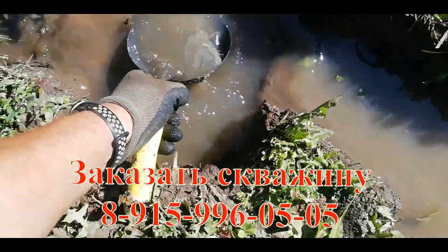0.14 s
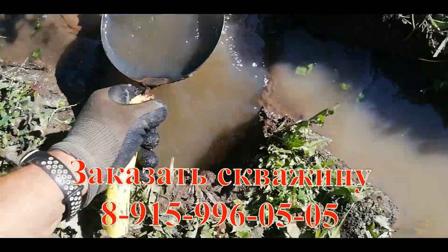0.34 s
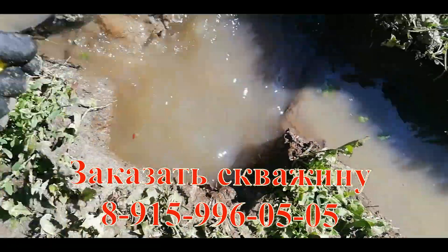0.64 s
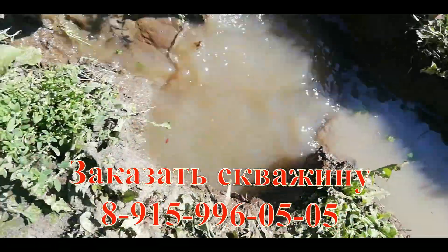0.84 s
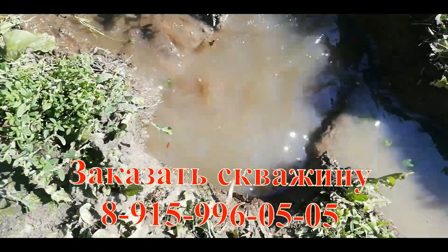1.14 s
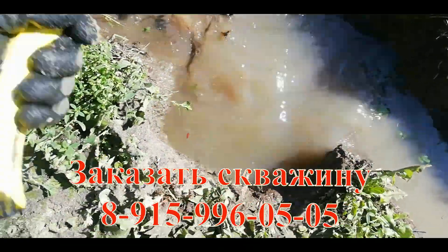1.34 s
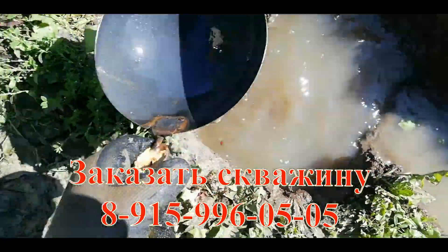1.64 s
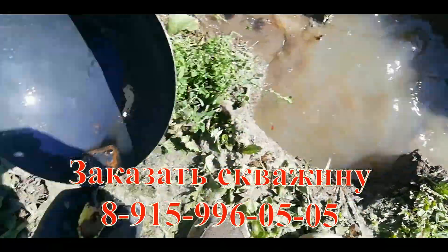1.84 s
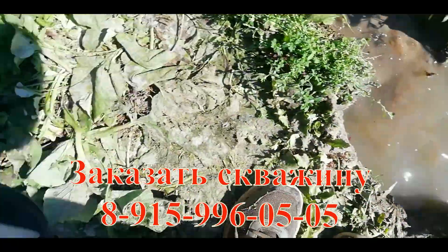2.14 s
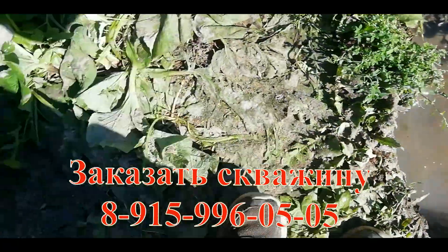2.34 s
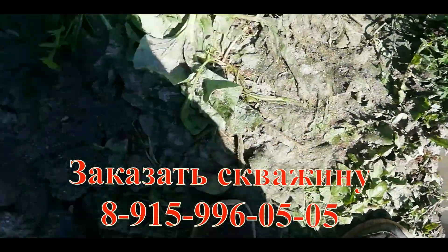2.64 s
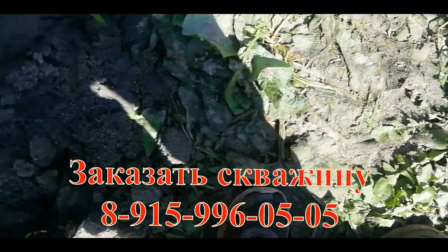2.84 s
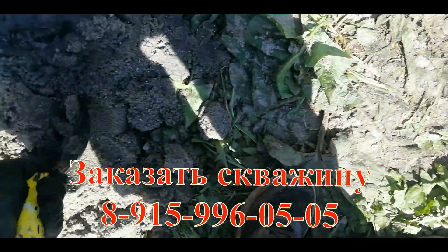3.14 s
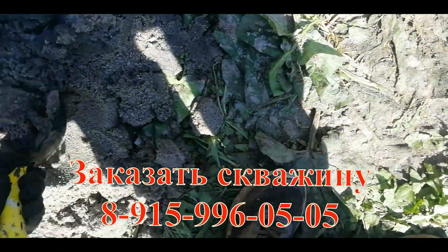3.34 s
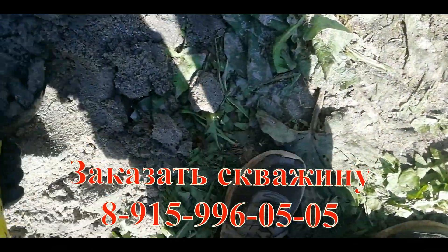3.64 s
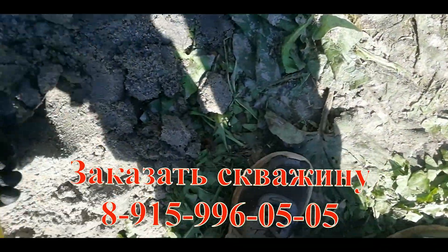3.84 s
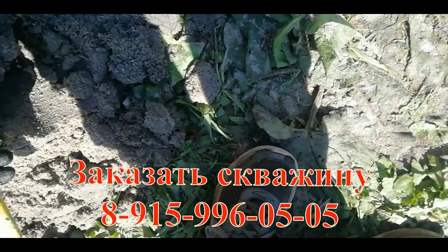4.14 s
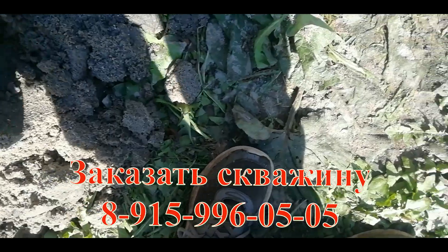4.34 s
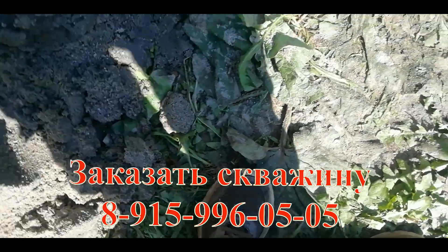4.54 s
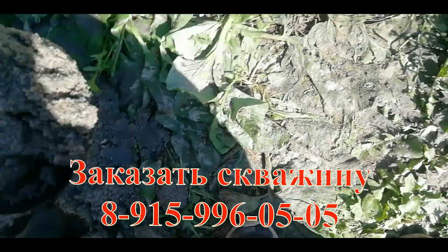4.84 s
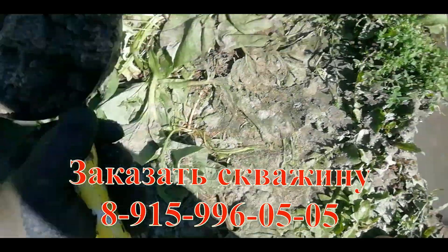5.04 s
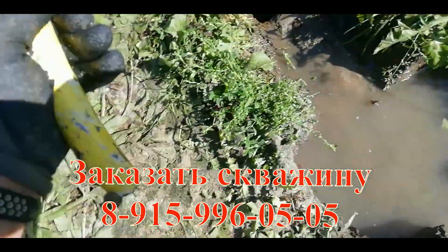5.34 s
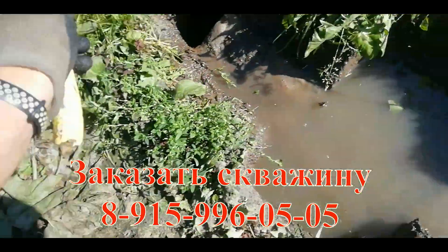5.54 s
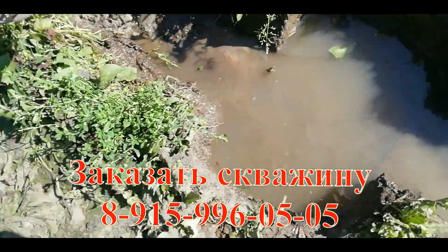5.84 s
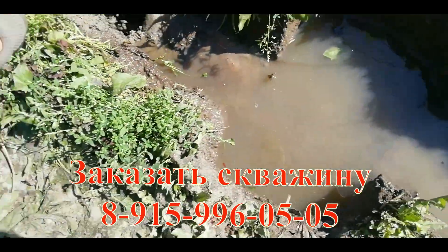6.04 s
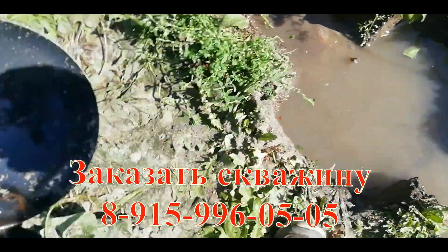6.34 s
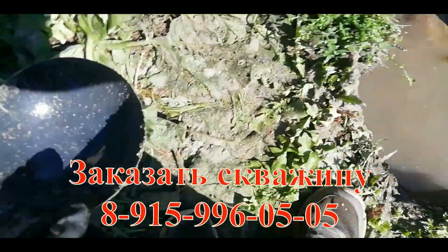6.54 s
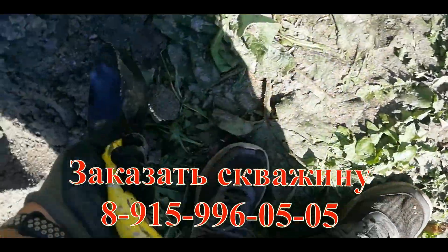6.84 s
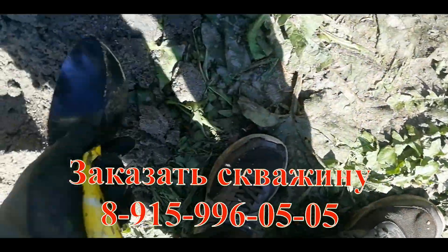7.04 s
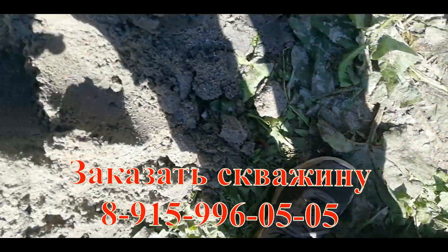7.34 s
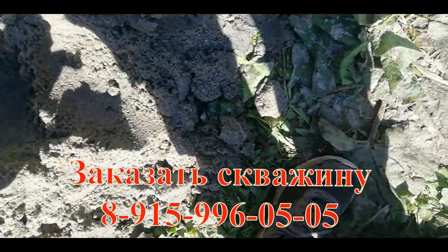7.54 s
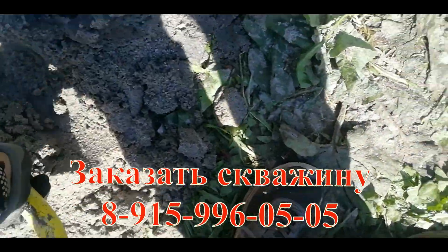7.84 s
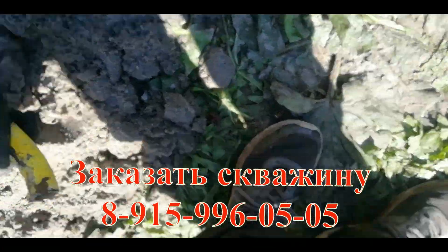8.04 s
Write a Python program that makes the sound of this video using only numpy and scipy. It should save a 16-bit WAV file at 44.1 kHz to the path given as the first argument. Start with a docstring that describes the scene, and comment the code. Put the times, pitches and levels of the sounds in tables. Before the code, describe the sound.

Close outdoor pickup on a handheld phone. A steel scoop scrapes lightly and knocks, leaves a muddy pool with a gulp, and throws water that lands with a spattering splash and bubbly drops. Another ringing scrape and clunk follow, then sharp hisses of wet sand with dull knocks. After quieter gurgling comes a sudden sandy swish, a longer rough metallic drag, and a last soft sandy slide.

```python
"""A steel scoop is dragged and knocked: stick-slip noise and short pushes ring its resonances.
It leaves a muddy pool with a gulp and empties with a splash of spray noise and ringing bubbles.
Wet sand hisses off it in separate strokes, as noise made of many tiny bursts with sharp ticks on top.
Water gurgles in a hollow nearby, under a faint outdoor wash with swishes, rumble and hum.
The two ports of a phone differ in colour and hear each source at slightly different times."""
import sys
import numpy as np
from scipy import signal
from scipy.fft import rfft, irfft, next_fast_len
from scipy.io import wavfile

SR = 44100
rng = np.random.default_rng(int(sys.argv[2]) if len(sys.argv) > 2 else 0)


def pcm_store(signal):
    """Save signal as 16-bit PCM."""
    levels = np.round(np.clip(np.atleast_2d(signal), -1, 1) * 32767)
    wavfile.write(sys.argv[1], SR, levels.astype(np.int16).T)


def makeup_ratio(level_db):
    """Linear amplitude ratio for a level in decibels (20 dB per factor of ten)."""
    decades = np.asarray(level_db, float) / 20
    return 10 ** decades


N = 361619
HZ = np.fft.rfftfreq(next_fast_len(N + 4096), 1 / SR)
T = np.arange(N) / SR

# Resonances of the steel and ground, in the order ring, rim, edge, bowl, handle, ground thud.
# Each row: pitch in Hz and width in Hz before any retuning, relative level in dB.
SCOOP_MODES = [
    [(735, 50, -5), (871, 275, 7), (920, 110, -9)],
    [(1391, 83, 13), (2050, 124, 11.5), (2353, 170, 2)],
    [(2630, 54, 4.5), (3030, 170, 2.5), (3646, 120, -4.5)],
    [(275.4, 47, 6), (327, 48, 1)],
    [(179, 20, 0)],
    [(61, 6, 0)],
]


def evened(x):
    """Scales to rms 1."""
    return x / np.sqrt(np.mean(x ** 2) + 1e-20)


def read(points):
    """Reads a (Hz, value) table at every frequency, evenly on a log pitch scale."""
    f, value = np.transpose(points)
    return np.interp(np.log(HZ + 1), np.log(f + 1), value)


def filtered(x, gain):
    """Multiplies the spectrum by gain."""
    spectrum = rfft(x, 2 * len(HZ) - 2)
    return irfft(spectrum * gain)[..., :N]


def modes(table, tuning=0.95):
    """Causal response of resonances with steep skirts; tuning multiplies each listed pitch."""
    return sum(makeup_ratio(db) / (1 + 1.3j * (HZ - f * tuning) / width) ** 2 for f, width, db in table)


def resonate(x, hz, width):
    """Two passes of a resonance of gain 1 that follows the curve hz."""
    turn = np.exp(2j * np.pi * np.cumsum(hz) / SR)
    r = np.exp(-1.54 * np.pi * width / SR)
    # shift the pitch to zero, smooth twice, and shift back
    smooth = signal.lfilter([(1 - r) ** 2], [1, -2 * r, r ** 2], x / turn)
    return 2 * (turn * smooth).real


def levels(db):
    """Gain of a level in dB that is silent below -100 dB."""
    return makeup_ratio(db) * (db > -100)


def lagged(db, lag_s):
    """The same level reached late, through one smoothing of its power."""
    r = np.exp(-1 / SR / lag_s)
    return 10 * np.log10(signal.lfilter([1 - r], [1, -r], makeup_ratio(2 * db)) + 1e-30)


def surges(rows):
    """Level in dB of overlapping surges: straight rise, hold, straight fall."""
    swing_db = 30  # each rise or fall time spans this many dB
    power = 0
    for s, db, rise, hold, fall in rows:
        away = np.clip(np.maximum((s - T) / rise, (T - s - hold) / fall), 0, 9)
        power = power + makeup_ratio(2 * (db - swing_db * away))
    return 10 * np.log10(power + 1e-30)


def wander(count, per_s):
    """Slow random drift: straight lines between random points of spread 1."""
    knots = rng.standard_normal(int(count * per_s / SR) + 2)
    return np.interp(np.arange(count) * per_s / SR, np.arange(len(knots)), knots)


def grains(per_s, spread_db, ms, bed):
    """Noise for both ports under one crowd of short bursts, a few of them large, over a steady bed."""
    size = makeup_ratio(spread_db * np.minimum(rng.exponential(1, N), 5))
    size = size * (rng.random(N) < per_s / SR)
    burst = signal.lfilter([1], [1, -np.exp(-1000 / SR / ms)], size ** 2)
    return np.sqrt(burst / burst.mean() + bed) * rng.standard_normal((2, N))


def grit(drive, fine, coarse, colour):
    """Colours grain noise and splits it near 8300 Hz; the fine (high) and coarse parts have own gains."""
    high = 1 / (1 + (8300 / (HZ + 1)) ** 20)
    gain = makeup_ratio(read(colour))
    fine_part = evened(filtered(drive, gain * high))
    coarse_part = evened(filtered(drive, gain * (1 - high)))
    return fine * fine_part + coarse * coarse_part


def bubble(hz, t, cycles):
    """A short ring whose pitch rises as the bubble nears the surface."""
    swell = t * hz / cycles * np.exp(1 - t * hz / cycles)
    return np.sin(2 * np.pi * hz * t * (1 + 4.1 * t)) * swell


def facing(db, share):
    """Gain of a steady source as the phone turns towards the pool and away from it."""
    # Each row: time in seconds, rise or drop in dB before share scales it.
    turning = [(0, 3), (.5, 1.7), (1.0, -4), (1.55, 4), (2.15, -1), (2.4, -2.5), (2.9, -6), (3.5, -5),
               (4.1, -5.5), (4.9, -6.5), (5.35, -3), (5.8, -2.5), (6.3, 1.5), (7.1, -5), (7.5, -8.5),
               (7.8, -5.5), (8.2, -3.5)]
    return makeup_ratio(db + share * np.interp(T, *np.transpose(turning)))


def drags():
    """Stick-slip rings the steel; the wandering contact favours one mode, then another, and bends the pitch."""
    # One table a drag along the ground.
    # Each row: time in seconds, pressure of the edge in dB, weight on the handle in dB (both relative).
    drag_tables = [
        [(0.0, -48.5, -7), (0.092, -45.5, 11.5), (0.1, -34.5, -4), (0.188, -51, 1), (0.232, -33.5, -2),
         (0.264, -42, 4), (0.336, -41.5, 6), (0.42, -58, -16)],
        [(1.628, -29, -22), (1.66, -30, -2), (1.724, -38.5, 3), (1.75, -29, -11), (1.814, -27, 1),
         (1.848, -31, 1), (1.868, -40, 10), (1.952, -32.5, -14), (2.016, -53, 13), (2.1, -50, -3)],
        [(2.91, -74, -2), (2.926, -40, -8), (2.97, -52, 7), (3.0, -45.5, -12), (3.042, -42, -8),
         (3.2, -54, -15)],
        [(6.25, -52, -33), (6.268, -37, -23), (6.306, -26.5, -16), (6.34, -35, -9), (6.374, -26.5, -9.5),
         (6.494, -37, 0), (6.51, -21.5, -7), (6.56, -36.5, 9.5), (6.602, -30, 8), (6.662, -29.5, -6),
         (6.674, -30, 2), (6.696, -28, 6.5), (6.724, -42.5, 14), (6.738, -27, 6.5), (6.786, -41, 8),
         (6.806, -38, 9.5), (6.926, -56, 13.5), (7.04, -53.5, -1)],
        [(7.9, -50, -31), (7.922, -51, -14), (8.024, -41, -27), (8.044, -42.5, -16), (8.2, -43, -26)],
    ]
    # Load and grip, one row a drag. Each row: pitch factor of ring, rim and edge,
    # bowl level in dB, rim and edge level in dB, ground thud level in dB (all relative).
    grips = [(1.1, 8, -5.5, -5), (1.083, 3.5, -12.5, -1.5), (.92, 4, 2.5, -6), (1.015, -1, -0.5, 4.5),
             (1.13, -8, 1.5, 1.5)]
    # How each part of SCOOP_MODES follows a drag.
    # Each row: relative level in dB, share of the pressure swing, share of the weight.
    follow = [(2, 0.9, 0.0083), (2.5, 0.87, 0.18), (-3.5, 0.77, 0.36), (0.5, 1, 0.27), (-1.5, 0.93, .99),
              (-7, 1, 0.87)]
    slips, out = grains(per_s=700, spread_db=2.3, ms=1.5, bed=0.6), np.zeros((2, N))
    for rows, (tuning, bowl_db, rim_db, thud_db) in zip(drag_tables, grips):
        a, b = round(rows[0][0] * SR), min(round(rows[-1][0] * SR) + 4000, N)
        s, press_db, weight_db = np.transpose(rows)
        on = np.clip(np.minimum(T - s[0], s[-1] - T) * 200, 0, 1)  # 5 ms fades at both ends
        grip_dbs = [0, rim_db, rim_db, bowl_db, 0, thud_db]
        for k, (part, (part_db, share, heavy), grip_db) in enumerate(zip(SCOOP_MODES, follow, grip_dbs)):
            row_db = part_db + grip_db - 35.5 + share * (press_db + 34.5) + heavy * weight_db
            level_db = np.interp(T, s, row_db)
            if k == 5:
                level_db = lagged(level_db, lag_s=0.038)  # the ground answers the weight slowly
            gain = on * makeup_ratio(level_db)
            # expected power of the part, used to even out its loudness
            power = np.mean(slips ** 2) * sum(2.42 * width / SR * makeup_ratio(2 * db) for _, width, db in part)
            for hz, width, db in part:
                # ring, rim and edge follow the pitch factor
                bend = (tuning if k < 3 else 1) * (1 + 0.021 * wander(b - a, per_s=15.87))
                favour = makeup_ratio(db + 3.5 * wander(b - a, per_s=42.74))
                if k < 4:
                    push = (gain * slips)[:, a:b] * favour / np.sqrt(power)
                    out[:, a:b] += resonate(push, hz * bend, width)
                else:  # handle and ground judder at their own pitch, less steady for a wider mode
                    shake = hz + 0.672 * width * wander(b - a, per_s=40.0)
                    judder = np.sqrt(2) * np.sin(2 * np.pi * np.cumsum(shake) / SR)
                    out[:, a:b] += gain[a:b] * favour * judder
    return makeup_ratio(-0.5) * out


def water():
    """Glugs ring the low mode of the hollow, trickling rings its higher ones."""
    # Louder glugs. Each row: start in seconds, peak of the swell in dB, starting pitch in Hz.
    glugs = [(0.485, -39, 320), (0.672, -31, 293), (0.983, -32, 290), (1.291, -31.5, 310),
             (1.547, -31, 320), (2.299, -33, 285), (3.345, -38.5, 290), (3.409, -35, 280), (3.47, -39, 338),
             (4.352, -39, 298), (4.968, -39, 310), (5.495, -40, 312), (5.6, -36, 330), (5.62, -36.5, 342),
             (6.056, -37, 291), (6.181, -36.5, 290), (7.572, -40, 312), (8.046, -36, 320)]
    # Upper, then middle modes of the hollow. Each row: pitch in Hz, width in Hz, relative level in dB.
    hollow = [
        [(1590, 35, -1), (1655, 18, 2), (1700, 30, -1), (2440, 90, -9)],
        [(826, 22, 1), (1110, 80, -6)],
    ]
    # Trickling in the upper, then the middle modes.
    # Each row: level in dB before the turn and a final 1 dB cut, share of the phone's turn.
    trickle = [(-47.5, 1.44), (-52, 1.35)]
    lumps = grains(per_s=60, spread_db=2.8, ms=8, bed=0.05)[[0, 0]]  # the same in both ports
    gurgle = evened(filtered(lumps, modes([(320, 68.5, 0)])))
    out = makeup_ratio(0.5) * facing(db=-48.5, share=1) * gurgle
    t = np.arange(2000) / SR
    for at, db, hz in glugs:
        start = round(at * SR)
        out[:, start:start + 2000] += makeup_ratio(db) * bubble(hz, t, cycles=0.99)
    for (db, share), part in zip(trickle, hollow):
        trickling = grains(per_s=220, spread_db=3, ms=4, bed=2.5)
        out += makeup_ratio(-1.0) * facing(db, share) * evened(filtered(trickling, modes(part, tuning=1)))
    return out


def outdoors():
    """A wide wash, a soft swish of leaves and cloth, a low rumble and a faint hum, all filtered noise."""
    # Colour of the wash. Each row: frequency in Hz, relative level in dB.
    wash_colour = [(90, -3), (316, -10.5), (537, -11.5), (900, 0), (1300, -3), (2000, -4), (3500, -6.5),
                   (4600, -9), (6000, -7), (7200, -10.5), (7700, -19.5), (9600, -16.5), (14600, -13),
                   (16300, -13.5)]
    # Swishes of leaves and cloth.
    # Each row: time of full swish in seconds, level in dB, rise in seconds, fall in seconds, centre in Hz.
    swishes = [(.01, -46.5, .1, 0.33, 2350), (.45, -47.5, 0.85, 0.5, 2500), (1.25, -50, 0.64, 0.35, 2520),
               (1.56, -45, 0.3, 1.5, 2960), (2.4, -47.5, 1.2, 3.6, 2820), (4.85, -50.5, 0.76, 1.5, 2410),
               (5.22, -43.5, 0.41, 0.4, 2480), (5.7, -53, .3, .5, 2520), (6.95, -57, 1.65, 0.41, 2250)]
    # Low bumps of the hand on the phone.
    # Each row: time of full bump in seconds, level in dB, rise, hold and fall in seconds.
    bumps = [(.01, -49, .1, .001, 0.71), (1.25, -40.5, 0.45, .001, 0.16), (1.516, -52, .8, .001, .4),
             (5.056, -63, 0.16, .001, .6), (5.69, -54, .3, .08, 0.55), (6.95, -47, 0.74, .05, 0.77),
             (7.9, -57, 1.3, .3, .7)]
    wash = grains(per_s=1300.0, spread_db=6.5, ms=2.2, bed=4.8)
    out = facing(db=-43, share=0.72) * evened(filtered(wash, makeup_ratio(read(wash_colour))))
    s, *_, swish_hz = np.transpose(swishes)
    swish = levels(surges([(at, db, rise, 0, fall) for at, db, rise, fall, _ in swishes]))
    rub = grains(per_s=300, spread_db=2.5, ms=8, bed=1.5)
    out += swish * evened(resonate(rub, np.interp(T, s, swish_hz), width=380))
    rumble = np.hypot(makeup_ratio(-59.5), levels(surges(bumps)))  # steady rumble plus bumps
    low_modes = modes([(44.5, 45, 6.0), (124, 110, -10)])
    out += rumble * evened(filtered(rng.standard_normal(N), low_modes))
    hum = evened(filtered(rng.standard_normal(N), modes([(85.8, 8, 0)])))
    return out + makeup_ratio(-61) * hum


def knocks():
    """Single dull pushes with grit ring the same modes."""
    # Each row: time in seconds, bowl peak in dB before a final 8.5 dB cut,
    # nearness to the rim in dB, handle above the bowl in dB.
    knock_rows = [(0.102, -33, -2, 6), (0.222, -17.5, -6.5, -24), (0.323, -36.5, -15, 15),
                  (1.024, -51, 30, -4), (1.099, -33, 14, -23), (1.23, -32.5, 3, 2), (1.633, -16.5, -4, -20),
                  (1.929, -36, 2, -21), (1.961, -15, -7, -11), (2.935, -29.5, -9, -18),
                  (2.95, -37.5, 14, -10), (3.043, -20.5, -8, -6.5), (3.063, -40, -1, -18),
                  (3.096, -27, -7, -6), (3.172, -31.5, 3, -3), (3.276, -25, -1, -26),
                  (3.763, -30.5, -3, -3), (4.067, -30, -25, -11.5), (4.448, -38, 2, 5),
                  (6.412, -25, -5, -9), (6.509, -15, -12, -6), (6.595, -17.5, 1, -20),
                  (6.689, -28.5, -8, 17.5), (6.731, -21.5, 9, -18), (6.839, -28, 11, -26),
                  (6.931, -43, 1, -10), (6.973, -40, 4, -2), (7.001, -44, 5, -6), (7.142, -37, 5.5, 4),
                  (7.217, -38, 9.5, -3)]
    s, db, near_db, handle_db = np.transpose(knock_rows)
    # ring and rim above the bowl, in dB
    ring_db = 2.2 + 0.38 * near_db
    rim_db = 1.5 + 1.2 * near_db
    t, out = np.arange(900) / SR, np.zeros((2, N))
    lead = .005  # seconds that the push starts before its listed time
    grit_rows = rng.standard_normal((len(s), 900)) * t / 0.0028 * np.exp(-t / 0.0031)
    push = 1.4 * t / 0.00086 * np.exp(-t / 0.00044)
    for part, above_db in zip(SCOOP_MODES, [ring_db, rim_db, rim_db - 4.5, 0 * db, handle_db]):
        rings = filtered(grit_rows + push, modes(part))[:, :4000]
        for at, ring, peak_db in zip(s - lead, rings, db + above_db):
            start = round(at * SR)
            out[:, start:start + 4000] += makeup_ratio(peak_db - 8.5) * ring / abs(ring).max()
    return out


def ticks():
    """Grains and drops snap: a sharp puff of noise with a short tail, rung by fine and coarse modes."""
    # Each row: start in seconds, peak in dB before filtering, coarse part above it in dB.
    snaps = [(0.1443, -15.5, -4), (0.232, -18, 3.5), (0.597, -10, -18), (0.6826, -10, -6), (0.7385, -6, -8),
             (0.777, -27, 8), (0.8956, -11, -12), (0.9898, -18, 6.5), (1.218, -14.5, -8), (2.874, -26, -22),
             (2.8976, -25, -25), (3.0694, 5.5, -34), (3.3328, -20, -17), (3.8955, -16, -12),
             (5.8435, -9, -9), (5.8497, 2, -14), (5.8695, -6, -10), (5.889, -9, -10), (6.1554, -11, -12),
             (7.1676, -11.5, -22), (7.2379, -19, -23), (7.2825, -13, -24), (7.597, -30, -51)]
    out, t = np.zeros((2, 2, N + 400)), np.arange(400) / SR
    for s, db, coarse_db in snaps:
        puff = rng.standard_normal((2, 400)) * (np.exp(-t / 0.0016) + 0.42 * np.exp(-t / 0.0047))
        puff /= abs(puff).max(1, keepdims=True)
        start = round(s * SR)
        out[..., start:start + 400] += makeup_ratio([db, db + coarse_db])[:, None, None] * puff
    fine = makeup_ratio(-3) * modes([(10900, 450, -3.0), (14500, 820, 2.0)])
    coarse = modes([(4650, 3300, 2.3)])
    return filtered(out[0], fine) + filtered(out[1], coarse)


def gulp():
    """One large bubble leaves the scoop; its pitch climbs ever faster as it nears the surface."""
    start_s, length_s, climb_s = .153, 0.042, 0.0453
    t = np.clip(T - start_s, 0, length_s)
    hz = 233.5 * (1 + (t / climb_s) ** 2)
    on = np.clip(np.minimum(T - start_s, start_s + length_s - T) / 0.0017, 0, 1)
    fade = makeup_ratio(-16.5 - 200 * t)  # loses 200 dB per second
    return on * fade * np.sin(2 * np.pi * np.cumsum(hz) / SR) * np.ones((2, 1))


def landing():
    """Gain of the thrown water as it lands, slap by slap."""
    # Each row: time of full slap in seconds, level in dB before the user's own trim,
    # rise, hold and fall in seconds.
    slaps = [(.595, -42, 0.083, .001, 0.14), (.665, -36.5, 0.11, 0.018, 0.16),
             (.725, -37.5, 0.13, 0.02, .015), (.78, -44, 0.023, .001, .05),
             (.825, -41.5, 0.022, .001, 0.083), (.95, -40, 0.2, 0.0012, .12), (.99, -34, 0.012, .001, 0.06),
             (1.028, -28, 0.068, .001, 0.11), (1.098, -31.5, 0.049, .001, 0.15),
             (1.18, -43, 0.18, .001, 0.29)]
    return levels(surges(slaps))


def drops():
    """Small bubbles ring where the thrown water lands, and single drops ring on their own."""
    # Single drops. Each row: start in seconds, peak of the swell in dB, starting pitch in Hz.
    drips = [(0.208, -41, 2400), (0.225, -29, 2330), (0.225, -29, 3480), (0.324, -29, 2420),
             (0.383, -37, 1610), (0.571, -36, 2330), (0.591, -36, 1510), (0.662, -36, 1670),
             (0.7078, -26, 3300), (0.7335, -24, 4240), (0.822, -40, 1640), (0.9487, -32, 3880),
             (0.9867, -33, 2880), (1.0053, -34, 1730), (1.0245, -24, 2900), (1.089, -27, 2570),
             (1.1772, -32, 3730)]
    out, t = np.zeros((2, N)), np.arange(1500) / SR
    for hz in np.geomspace(800, 7000, 18):
        train = makeup_ratio(4.9 * np.minimum(rng.exponential(1, N), 4)) * (rng.random(N) < 30.0 / SR)
        ringing = signal.oaconvolve(train, bubble(hz, t, cycles=3.0))[:N]
        out += ringing * rng.uniform(0.92, 1, (2, 1))
    out = makeup_ratio(-8.5) * landing() * evened(out)
    for s, db, hz in drips:
        start = round(s * SR)
        out[:, start:start + 1500] += makeup_ratio(db) * bubble(hz, t, cycles=4.6)
    return out


def splash():
    """Water thrown from the scoop: fine spray follows the throws, coarse noise follows the landings."""
    # Each row: time of full spray in seconds, spray level in dB, rise, hold and fall in seconds.
    throws = [(.59, -44.5, 0.063, 0.15, .05), (.74, -36, 0.047, 0.00088, 0.009),
              (.776, -43, 0.045, .001, 0.034), (.816, -43, 0.018, .001, .08),
              (.904, -43.5, .01, .001, 0.37), (.988, -35.5, .011, 0.045, 0.083),
              (1.07, -42.5, .05, .016, 0.36)]
    # Colour of the spray. Each row: frequency in Hz, relative level in dB.
    spray_colour = [(410, -49), (700, -16), (748, -8), (1070, -0.5), (1280, -4), (1440, -2), (2980, 3.5),
                    (4200, -2), (6150, 1.5), (7690, -7), (10800, -5), (14900, 4), (16300, -23)]
    drive = grains(per_s=900, spread_db=2.4, ms=1.2, bed=0.7)
    return grit(drive, levels(surges(throws)), makeup_ratio(1.9) * landing(), spray_colour)


def sand():
    """Fine grit leads each surge of sliding sand; coarse grit comes late and lingers."""
    # Each row: time of full flow in seconds, fine grit level in dB, rise in seconds,
    # fall of the fine grit in seconds, coarse grit above the fine in dB.
    slides = [(2.896, -23.5, 0.026, 0.063, -16), (2.913, -24, 0.038, 0.074, -3.5),
              (3.004, -27.5, 0.12, 0.4, -5), (3.07, -28, 0.24, .08, -9), (3.133, -23.5, 0.13, 0.072, -2.5),
              (3.414, -38, 0.063, 0.16, 2.5), (3.495, -47.5, 0.17, 0.074, 10), (3.645, -37, .1, 0.14, 0.5),
              (3.775, -57.5, 0.062, 0.13, 12), (3.904, -33.5, 0.094, 0.12, -3), (3.96, -41.5, .05, .1, 0.5),
              (4.035, -40, 0.091, 0.19, -2), (4.075, -44.5, .1, 0.038, -1), (5.845, -22, 0.065, .15, -5.5),
              (5.896, -33, .05, 0.8, -4), (6.154, -42.5, 0.035, 0.11, -4), (7.168, -42, 0.0087, .04, -20),
              (7.247, -47, 0.28, 0.2, -2), (7.596, -34.5, 0.0029, 0.6, -5.5),
              (7.65, -36.5, 0.047, 0.37, -1.5), (7.725, -34.5, 0.17, 0.14, 3.5),
              (7.865, -35, 0.28, 0.41, -1.5), (8.055, -39.5, 0.9, 0.07, 3.5), (8.19, -49, 0.36, .2, 6.5)]
    # Colour of the sand. Each row: frequency in Hz, relative level in dB.
    sand_colour = [(710, -37), (1200, -19), (1820, -17), (2000, -11.5), (2750, -10.5), (3380, -3.5),
                   (4400, -6.5), (6380, -3), (7680, -13.5), (8940, -13.5), (11500, -5.5), (13500, -7),
                   (14600, 0), (15300, -3), (16300, -63)]
    coarse_pace = 0.77  # the coarse grit falls at this share of the fine grit's pace
    fine_db = surges([(s, db, rise, 0, fall) for s, db, rise, fall, _ in slides])
    coarse_db = surges([(s, db + above_db, rise, 0, fall / coarse_pace)
                        for s, db, rise, fall, above_db in slides])
    drive = grains(per_s=1700.0, spread_db=1.5, ms=1.0, bed=0.46)
    late_db = lagged(coarse_db, lag_s=0.004)  # the coarse grit gets moving later
    return grit(drive, levels(fine_db), levels(late_db), sand_colour)


def ports(pair, lag_ms, balance, blur):
    """Both ports share the bass; above it the left is late by lag_ms; more blur makes them less alike."""
    # Each row: frequency in Hz, likeness of left and right (0 to 1) before blur and shared bass.
    likeness = [(60, 0.57), (130, 0.81), (300, 0.68), (700, 0.091), (1500, 0.22), (4000, 0.14),
                (15000, 0.18)]
    apart = HZ ** 4 / (HZ ** 4 + 170 ** 4)  # the bass is mono
    same = np.clip(read(likeness), 0, 1) ** (blur * apart)
    tilt = makeup_ratio(apart * read(balance) / 2)
    a, b = rfft(pair, 2 * len(HZ) - 2)
    mid = np.sqrt(tilt ** 2 + tilt ** -2 + 2 * same) / 2  # keeps the sum of the ports level
    late = np.exp(-2j * np.pi * HZ * lag_ms / 1000 * apart)
    left = tilt * late * a
    right = (same * a + np.sqrt(1 - same ** 2) * b) / tilt
    return irfft(np.array([left, right]) / mid)[:, :N]


def scene():
    """All sources, each from its own side."""
    # Colour of the ports by direction: sand and splash, pool, scoop.
    # Each row: frequency in Hz, left above right in dB before the bass is shared.
    from_sand = [(60, -5), (99, 0.5), (160, 0.0), (270, 2), (450, 5), (740, 17), (1220, 2.5), (2010, 1),
                 (3330, -6.5), (5500, -14), (9080, -0.5), (15000, 21)]
    from_pool = [(60, -2), (99, 21), (160, 0), (270, 4), (450, -0.5), (740, -4.5), (1220, -3), (2010, -6),
                 (3330, -4.5), (5500, -9), (9080, -4), (15000, 32)]
    from_scoop = [(60, 1.5), (110, 12), (200, 2), (380, -6), (700, 7.5), (1290, -2), (2380, -7),
                  (4400, -5.5), (8120, -9), (15000, 15)]
    steel = ports(drags() + knocks() + gulp(), lag_ms=-.25, balance=from_scoop, blur=.15)
    pool = ports(water() + outdoors(), lag_ms=0.596, balance=from_pool, blur=0.77)
    thrown = ports(splash() + drops(), lag_ms=0.478, balance=from_sand, blur=2.7)
    sliding = ports(sand() + ticks(), lag_ms=-0.404, balance=from_sand, blur=1.0)
    return steel + pool + thrown + sliding


def band_limit(x):
    """A steep low-pass at the top of the band."""
    return signal.sosfilt(signal.butter(12, 16640, fs=SR, output="sos"), x)


def record(dry):
    """A soft knee rounds the highest peaks, then a steep filter removes what lies above 16 kHz."""
    soft = .85 * np.tanh(dry / .85)
    mix = filtered(soft, 1 / (1 + (HZ / 16000) ** 80))
    return band_limit(mix)


dry = scene()
out = record(dry)
pcm_store(out)
```